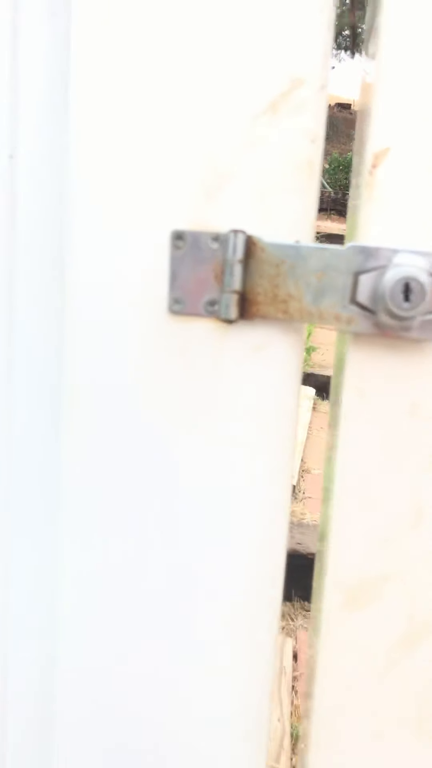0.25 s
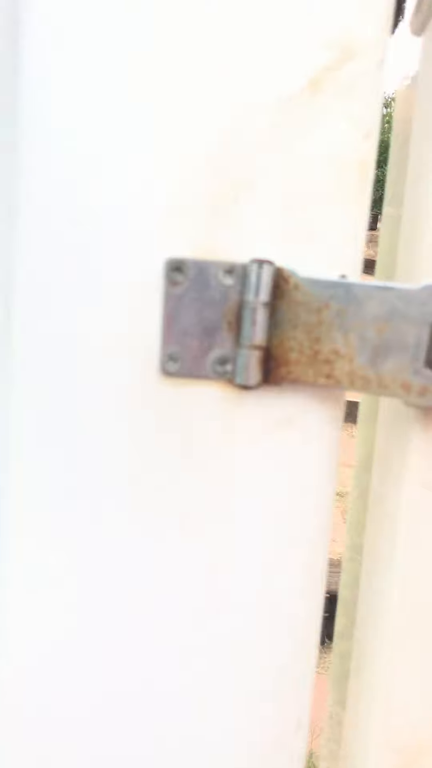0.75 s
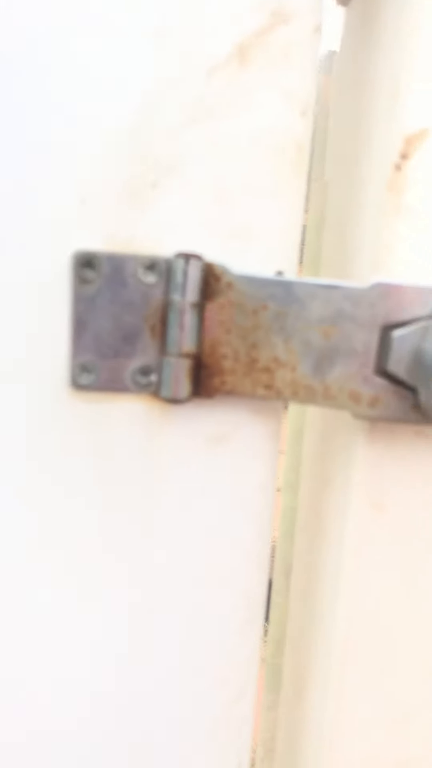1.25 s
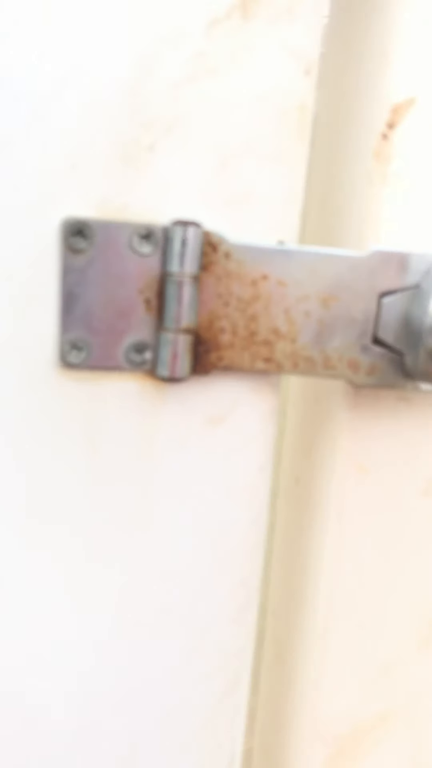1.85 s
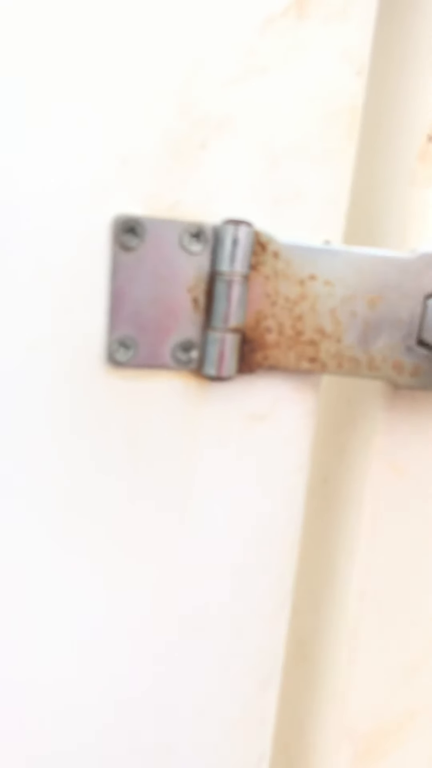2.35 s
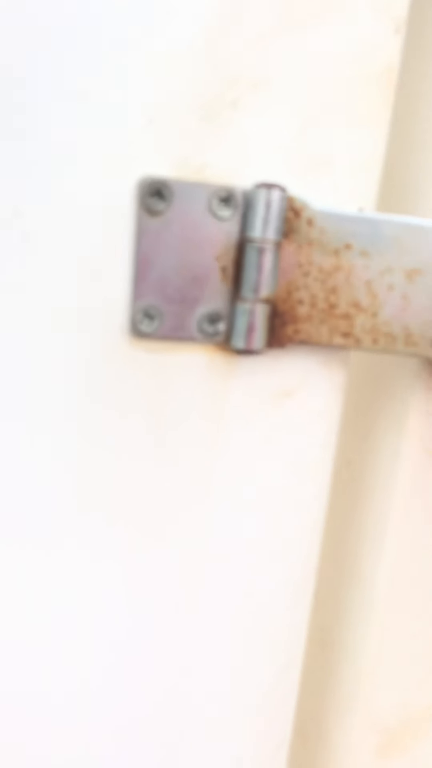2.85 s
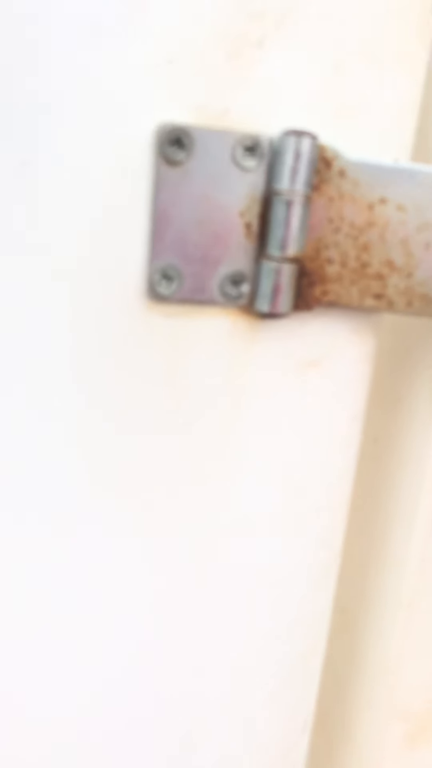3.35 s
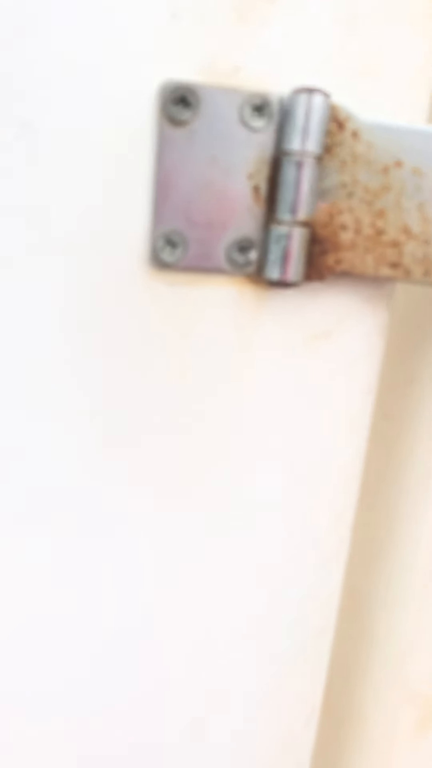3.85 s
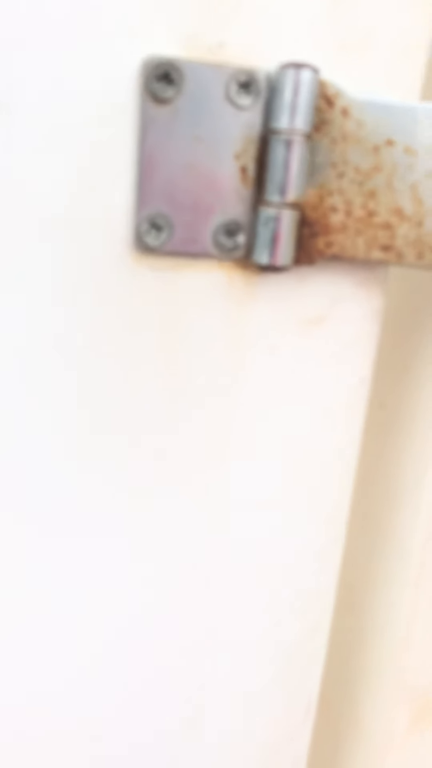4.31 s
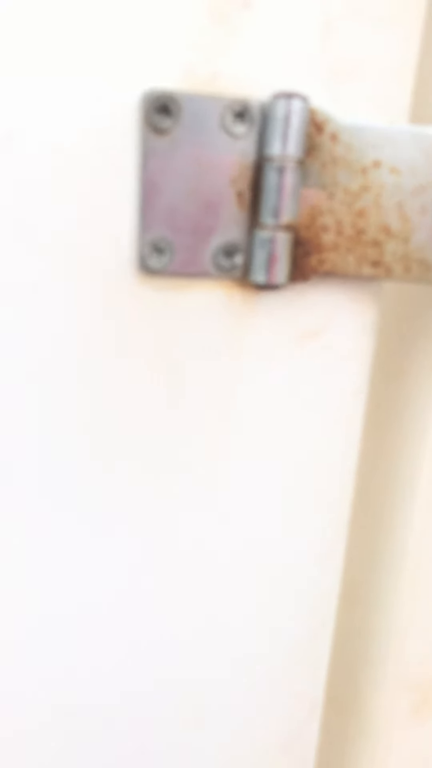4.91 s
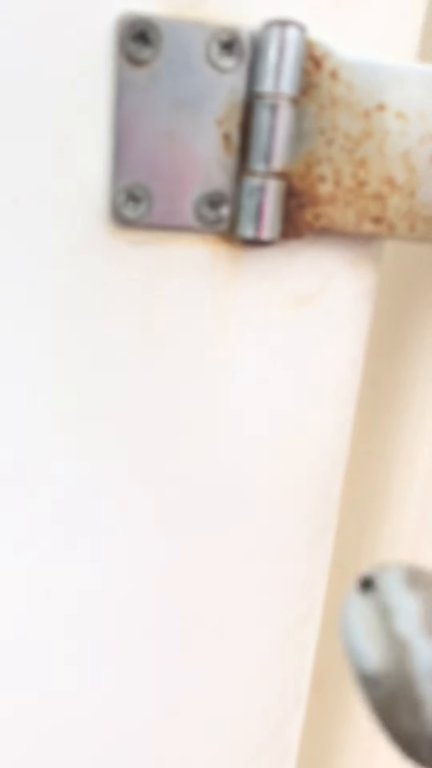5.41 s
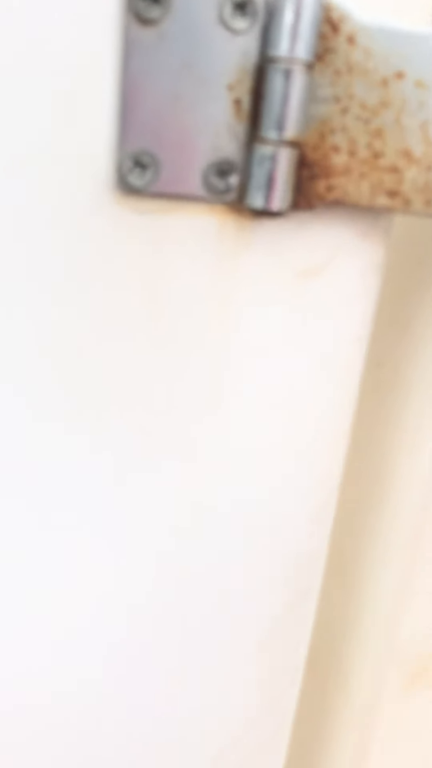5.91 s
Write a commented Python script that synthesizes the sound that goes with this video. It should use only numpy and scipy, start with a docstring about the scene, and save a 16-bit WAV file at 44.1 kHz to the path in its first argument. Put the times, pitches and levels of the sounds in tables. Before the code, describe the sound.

Dry, close outdoor sound over a soft low rumble that builds slightly in the first two seconds. A hand rustles at the start and again around 0.7 s, with small steel ticks from 0.8 to 1.0 s. Pins ping at 1.25 s as the key goes in; hard bright snaps come at 1.5 and 1.67 s, then the hollow gate bumps loudest at 1.9 s, with a low thud again at 2.14 s. A far bird gives thin, buzzy gliding whistles, clearest between 2 and 3.3 s. Keys jingle finely and metal rubs and ticks, quieter from 3 to 4 s. Bright key clinks at 4.1 and 4.4 s lead to clacks at 4.55 and 4.86 s. At 5.25-5.6 s the rusty hasp squeaks very briefly and scrapes in gritty bursts. Rustling and scattered light ticks end it by about 6 s.

```python
"""A hand brushes past and a key is worked into the lock of a steel hasp on a hollow fence gate, outdoors.
Each contact rings keys, hasp, panel and frame by its own levels: noise bursts plus decaying sines. Early on a far
bird calls in gliding noise bands over a filtered-noise rumble; sprung pins ping, the lock snaps, and the gate bumps
on its lowest mode as the lock lets go. Keys jingle as grazed high modes; late clicks follow. Last, the hasp
opens: random slips scrape through steel resonances, a gliding tone squeaks, and filtered slips rustle as the hand brushes."""
import sys
import numpy as np
from scipy import signal
from scipy.fft import rfft, irfft, next_fast_len
from scipy.io import wavfile
from scipy.ndimage import uniform_filter1d

SR = 44100
rng = np.random.default_rng(int(sys.argv[2]) if len(sys.argv) > 2 else 0)


def int16_out(signal):
    """Quantize to a 16-bit WAV file."""
    q = np.round(np.clip(np.atleast_2d(signal).T, -1, 1) * 32767)
    wavfile.write(sys.argv[1], SR, q.astype(np.int16))


N = 272097
TIME = np.arange(N) / SR
RING_TIME = np.arange(SR // 3) / SR

# Modes of the keys. Each row: frequency in Hz, relative level in dB, t60 in seconds.
KEYS = [(6380, -5, 0.067), (7130, -6, 0.048), (7500, -7, 0.082), (8600, -9, 0.028), (9300, -9, 0.032),
        (9860, -3, 0.033), (11500, -5.5, 0.063), (12500, -26, 0.037), (14400, -49.5, .05),
        (14170, -5.5, 0.026)]
# Spectrum of the hiss of rubbed steel. Each row: frequency in Hz, relative density in dB.
HISS_COLOUR = [(1000, 0), (2400, -11), (3200, -1), (4700, 0.5), (7000, -3.5), (10000, -27), (16000, -5)]
# How hard the hand works key and hasp. Each row: time in seconds, relative level of rubbing steel in dB.
EFFORT = [(0.0, -81), (0.93, -74), (1.48, -67), (1.89, -62.5), (2.23, -81), (2.42, -69), (2.58, -66),
          (2.75, -64.5), (3.28, -71.5), (3.73, -76), (3.88, -76), (4.29, -80.5), (4.52, -69.5), (5.29, -62),
          (5.41, -58.5), (5.46, -69), (5.59, -74), (6.17, -72)]


def from_db(db):
    """Decibels to gain."""
    return 10 ** (np.asarray(db) / 20)


def rms_one(x):
    """Scale to unit rms."""
    return x / np.sqrt(np.mean(x ** 2) + 1e-20)


def in_time(rows):
    """Each column of a curve at every sample."""
    s, *columns = np.transpose(rows)
    return [np.interp(TIME, s, c) for c in columns]


def add(track, s, sound):
    """Mix a sound in at time s."""
    at = int(s * SR)
    track[at:at + len(sound)] += sound[:N - at]


def coloured(x, colour):
    """Causal (minimum-phase) filter with the given spectrum."""
    size = next_fast_len(len(x) + 2048, True) // 2 * 2
    hz, db = np.transpose(colour)
    bin_hz = np.arange(size // 2 + 1) * SR / size
    log_gain = np.log(from_db(np.interp(np.log(bin_hz + 1), np.log(hz), db)))
    # folding the cepstrum onto positive time gives minimum phase
    cepstrum = irfft(log_gain)
    cepstrum[1:size // 2] *= 2
    cepstrum[size // 2 + 1:] = 0
    return irfft(rfft(x, size) * np.exp(rfft(cepstrum)))[:len(x)]


def noise(colour):
    """Steady coloured noise, rms 1."""
    return rms_one(coloured(rng.standard_normal(N), colour))


def drift(per_s):
    """Random curve through per_s knots a second, rms 1."""
    knots = rng.standard_normal(int(N / SR * per_s) + 2)
    return rms_one(np.interp(TIME * per_s, np.arange(len(knots)), knots))


def swells(rows, drop_db=23.5):
    """Gain of movements that swell and fade evenly, drop_db weaker one half-length from their middles."""
    return sum(from_db(db - drop_db * np.abs(TIME - s) / half_s) for s, half_s, db in rows)


def dying(t60_s):
    """Exponential decay after a blow."""
    return from_db(-60 * RING_TIME / t60_s)


def mode_shapes(modes):
    """One decaying sine per mode."""
    return np.array([from_db(db) * dying(t60_s) * np.sin(2 * np.pi * hz * RING_TIME)
                     for hz, db, t60_s in modes])


def resonance(x, hz, sharpness):
    """A broad resonance with gain 1 on top."""
    return signal.lfilter(*signal.iirpeak(hz, sharpness, fs=SR), x)


def slips(per_s, spread_db):
    """Random tiny slips of uneven size."""
    return (rng.random(N) < per_s / SR) * rng.standard_normal(N) * from_db(spread_db * drift(220))


def rubbed_steel(per_s, spread_db):
    """Slips ring the resonances of the steel; rms 1."""
    # Resonances of rubbed steel. Each row: frequency in Hz, relative level in dB, t60 in seconds.
    resonances = [(2373, -2, 0.044), (3770, 5.5, 0.0048), (4520, 6, 0.012), (4950, 5, 0.0054),
                  (6850, 1.5, 0.0058), (8960, -17, .02), (9700, -23, 0.0077), (12500, -7, .012),
                  (14500, -15, .008)]
    ring = mode_shapes(resonances).sum(axis=0)
    return rms_one(signal.fftconvolve(slips(per_s, spread_db), ring)[:N])


def swish(length_s, hz, width_hz):
    """A band of noise around a steady or moving centre that swells and fades."""
    count = int(length_s * SR)
    low_pass = signal.butter(3, width_hz / 2, fs=SR, output="sos")
    wobble = signal.sosfilt(low_pass, rng.standard_normal(count) + 1j * rng.standard_normal(count))
    carrier = np.exp(2j * np.pi * np.cumsum(hz * np.ones(count)) / SR)
    return rms_one((wobble * carrier).real) * signal.windows.tukey(count, .5)


def outdoors(rumble_db=-46.5, air_db=-57.5, approach_s=2, approach_db=-4.5):
    """Even air, and a low rumble that builds as the gate is approached: two coloured noises."""
    # Spectra of rumble and air. Each row: frequency in Hz, relative density in dB.
    rumble_colour = [(12, -52), (20, -20.5), (29, -24.5), (36, -33), (44, -2), (59, 2.5), (108, -1),
                     (140, -5), (179, -6.5), (211, -9.5), (330, -17), (430, -25.5), (730, -120)]
    air_colour = [(140, -29), (230, -4.5), (303, -3), (386, -3.5), (422, -5), (520, -6), (835, -3.5),
                  (1500, -10.5), (2270, -20.5), (3200, -32), (4160, -25), (7040, -120)]
    build_db = approach_db * np.clip(1 - TIME / approach_s, 0, 1)
    return from_db(rumble_db + build_db) * noise(rumble_colour) + from_db(air_db) * noise(air_colour)


def far_bird():
    """Thin, buzzy whistles: noise bands glide, then level off, under a fast random flutter."""
    # Each row: start in seconds, length in seconds, start in Hz, end in Hz, width in Hz, relative level in dB.
    calls = [(0.379, 0.2, 8500, 8300, 500, -73), (1.257, 0.24, 7960, 8250, 550, -67),
             (2.078, 0.32, 5770, 7120, 1140, -60), (2.79, 0.14, 8300, 8300, 500, -65),
             (2.347, 0.136, 7900, 8100, 500, -69), (2.957, 0.3, 6450, 7200, 1100, -61)]
    out = np.zeros(N)
    for s, length_s, start_hz, end_hz, width_hz, db in calls:
        glide = np.linspace(1, 0, int(length_s * SR)) ** 2
        hz = end_hz + (start_hz - end_hz) * glide
        add(out, s, from_db(db) * swish(length_s, hz, width_hz))
    return out * from_db(0.74 * drift(180) - 6.0)


def hand_rustle(floor_db=-74, trim_db=3.0):
    """Hand and sleeve rustle in very dense slips that swell as they brush past."""
    # Each row: middle in seconds, half-length in seconds, relative level in dB.
    brushes = [(0.04, 0.16, -56), (0.3, 0.38, -68.5), (0.66, 0.18, -58), (1.9, 0.82, -62.5),
               (5.42, 0.11, -58), (6.0, 0.59, -62)]
    # Spectrum of the rustle. Each row: frequency in Hz, relative density in dB.
    rustle_colour = [(1350, -6.5), (2300, -3), (5030, -5.5), (6140, -6), (7540, -10.5), (8530, -8),
                     (10700, -14), (12800, -9), (15800, -17), (16500, -71.5)]
    movement = np.hypot(from_db(floor_db), swells(brushes))
    return movement * from_db(trim_db) * rms_one(coloured(slips(25000, 2.05), rustle_colour))


def key_rubbing():
    """The key rubs in the lock; rough spots catch and release in a fine crackle."""
    effort_db, = in_time(EFFORT)
    rubbing = from_db(effort_db - 2.5) * rubbed_steel(per_s=2500, spread_db=2.0)
    catches = from_db(effort_db - 4) * rms_one(coloured(slips(450, 1.5), HISS_COLOUR))
    return rubbing + catches


def jingle(per_s=120, centre_hz=12300, width_hz=4000, count=7, stir_db=-77):
    """Loose keys of slightly different sizes graze each other and ring mostly in their highest modes."""
    # Shakes of the bunch. Each row: middle in seconds, half-length in seconds, relative level in dB.
    shakes = [(1.875, 0.15, -53), (2.5, 0.16, -57), (3.15, 0.34, -57), (3.86, 0.26, -58.5),
              (4.555, 0.066, -55)]
    out = np.zeros(N)
    keys = [mode_shapes([(hz * size, db, t60_s) for hz, db, t60_s in KEYS])
            for size in np.linspace(.93, 1.05, count)]
    high = np.exp(-((np.array(KEYS)[:, 0] - centre_hz) / width_hz) ** 2)
    shaking = np.hypot(from_db(stir_db), swells(shakes))  # barely stirs in between
    for s in rng.uniform(0, TIME[-1], int(per_s * TIME[-1])):
        strength = shaking[int(s * SR)] * from_db(rng.normal(0, 3))
        weights = high * rng.standard_normal(len(KEYS))
        add(out, s, strength * weights @ keys[rng.integers(count)])
    return out


def key_in_lock(pin_t60_s=0.0095, pin_rise_s=0.00023):
    """Sprung pins ping briefly over the key's teeth; the key slides with an uneven, grainy hiss."""
    # Each row: time in seconds, frequency in Hz, level in dB before the attack.
    pins = [(1.2337, 4440, -25), (1.2454, 4660, -20.5), (1.2629, 4580, -21.5), (1.4818, 4330, -38),
            (1.49, 4350, -36)]
    # Slides on steel. Each row: start in seconds, length in seconds, centre in Hz, width in Hz, relative level in dB.
    slides = [(1.27, 0.12, 4440, 1700, -70), (1.85, 0.046, 8450, 2480, -61), (2.47, 0.051, 5500, 5300, -52),
              (2.545, 0.037, 5500, 3200, -66), (2.36, 0.018, 6000, 4500, -65),
              (2.625, 0.068, 4850, 3800, -67), (3.868, 0.032, 1700, 2200, -56.5),
              (5.384, 0.079, 9600, 2200, -63), (5.349, 0.296, 3960, 2800, -64),
              (4.75, 0.048, 10000, 4000, -70), (5.458, 0.18, 6660, 1000, -68),
              (6.02, 0.048, 4600, 2510, -61.5)]
    pings, sliding = np.zeros(N), np.zeros(N)
    attack = 1 - np.exp(-RING_TIME / pin_rise_s)
    for s, hz, db in pins:
        add(pings, s, mode_shapes([(hz, db, pin_t60_s)])[0] * attack)
    for s, length_s, hz, width_hz, db in slides:
        add(sliding, s, from_db(db) * swish(length_s, hz, width_hz))
    return pings + sliding * from_db(4.5 * drift(250))


def scrape():
    """Rusty steel grinds in dense slips as the hasp swings open, and the hinge briefly sings."""
    # Each row: time in seconds, relative grinding level in dB, relative hiss level in dB.
    rub = [(5.18, -66, -76), (5.28, -47, -42.5), (5.316, -48, -51), (5.332, -31.5, -50),
           (5.346, -47.5, -58), (5.49, -52.5, -49.5), (5.554, -36.5, -52), (5.564, -44, -44.5),
           (5.72, -81, -92)]
    # Spectrum of the grinding. Each row: frequency in Hz, relative density in dB.
    grind_colour = [(150, -12), (450, 6.5), (1000, 8), (1600, -7), (2500, -7.5), (5000, -34)]
    # Hinge squeak. Each row: time in seconds, mean pitch in Hz, relative level in dB.
    squeak_curve = [(5.228, 1003, -71), (5.238, 958, -38), (5.25, 945, -46), (5.266, 1028, -64),
                    (5.277, 1094, -30), (5.285, 1160, -28.5), (5.291, 1720, -36), (5.303, 1420, -35),
                    (5.313, 1500, -49)]
    grind_db, hiss_db = in_time(rub)
    moving = (TIME > rub[0][0]) & (TIME < rub[-1][0])
    moving = uniform_filter1d(1. * moving, size=900)
    grind = from_db(grind_db + 1.0) * rms_one(coloured(slips(1600, 2.5), grind_colour))
    hiss = from_db(hiss_db - 10) * rms_one(coloured(slips(1500, 3.3), HISS_COLOUR))
    ringing = from_db(hiss_db - 6.0) * rubbed_steel(per_s=610, spread_db=5.5)
    hz, squeak_db = in_time(squeak_curve)
    phase = 2 * np.pi * np.cumsum(hz * (1 + 0.03 * drift(700))) / SR
    tone = np.sin(phase) + from_db(-17) * np.sin(2 * phase)
    squeak = from_db(squeak_db + 3.7 * drift(300)) * tone
    singing = (TIME > squeak_curve[0][0]) & (TIME < squeak_curve[-1][0])
    return moving * (grind + hiss + ringing) + singing * squeak


def sway(hz=63, t60_s=0.15, rise_s=0.033, knock_hz=440, knock_t60_s=.028):
    """The hollow post knocks at once; the gate's lowest mode swells as the blow spreads through it."""
    # Blows that move the whole gate. Each row: time in seconds, relative sway level in dB, knock level in dB.
    blows = [(1.516, -43, -43), (1.668, -49, -48), (1.9067, -22.5, -13), (2.144, -29.5, -35),
             (4.555, -44, -41), (4.867, -33.5, -48)]
    out = np.zeros(N)
    swell = 1 - np.exp(-RING_TIME / rise_s)
    for s, db, knock_db in blows:
        add(out, s, swell * mode_shapes([(hz, db + 9.5, t60_s)])[0])
        add(out, s, mode_shapes([(knock_hz, knock_db, knock_t60_s)])[0])
    return out


def faint_ticks(per_s=7, hasp_hz=(2000, 5400), keys_hz=(6200, 14000), spread_db=4):
    """The key shifts in its slot at random moments, harder with more effort."""
    count = int(per_s * TIME[-1])
    s = (np.arange(count) + rng.random(count)) / count * TIME[-1]
    effort_db = np.interp(s, *np.transpose(EFFORT))
    frame, panel, hasp, keys = effort_db + spread_db * rng.standard_normal((count, 4)).T
    return list(zip(s, frame + 9, panel + 9, hasp + 10.5, rng.uniform(*hasp_hz, count),
                    keys + 3.5, rng.uniform(*keys_hz, count)))


def contacts():
    """Every blow spreads from the part it hits to the others.

    Each row: time in seconds, frame dB, panel dB, hasp dB, hasp Hz, keys dB, keys Hz; levels relative."""
    # Keys clink on ring and lock. Each row: time in seconds, relative level in dB, strongest frequency in Hz.
    key_clinks = [(0.107, -46.5, 6170), (1.234, -44, 14800), (1.361, -51, 13200), (1.509, -32, 12900),
                  (2.7405, -58, 15000), (3.12, -51, 11000), (3.3517, -63, 14000), (3.5558, -50, 11700),
                  (3.7283, -54, 11400), (3.8881, -49, 9200), (4.0923, -35, 6850), (4.1846, -52, 6100),
                  (4.2383, -53.5, 9250), (4.314, -53, 6260), (4.3985, -33.5, 7950), (4.422, -37, 14600),
                  (4.45, -47, 14200), (4.526, -50, 14300), (4.7418, -57, 7100), (4.7973, -33.5, 12300),
                  (4.845, -44, 9700), (4.864, -29.5, 11900), (5.233, -52.5, 11600), (5.423, -50, 7350),
                  (5.6506, -54, 12200), (5.6745, -55, 12400), (5.7844, -44.5, 9300), (5.7973, -43, 13700),
                  (5.9303, -51.5, 8000)]
    # Steel snaps in lock and hasp. Each row: time in seconds, hasp level in dB, hasp's strongest frequency in Hz,
    # gate level in dB, keys level in dB, keys' strongest frequency in Hz; levels relative.
    lock_clicks = [(0.277, -57, 2170, -58, -70, 6320), (0.7624, -50, 4250, -50.5, -55, 8770),
                   (0.7911, -45, 4180, -41.5, -46.5, 12800), (0.9665, -47.5, 3970, -48, -59, 6400),
                   (1.0146, -42.5, 4100, -38, -35.5, 9300), (1.1624, -59, 2100, -64, -64, 6270),
                   (1.245, -53, 4600, -52, -50, 14000), (1.251, -52, 4600, -39, -51, 8800),
                   (1.297, -38, 3650, -33.5, -44, 8300), (1.3083, -48, 4500, -42, -58, 6400),
                   (1.5129, -26.5, 4450, -21, -45, 6050), (1.5331, -36, 3880, -28.5, -44.5, 6200),
                   (1.6646, -38, 4800, -31.5, -50, 8160), (1.6677, -20, 4340, -22.5, -27, 8000),
                   (1.6752, -33, 3730, -37, -39, 8300), (1.68, -26, 3700, -27.5, -35.5, 6370),
                   (2.3789, -63, 4940, -52, -63, 6400), (2.413, -45, 4440, -53.5, -39, 11100),
                   (2.491, -51, 5200, -47.5, -43.5, 7600), (2.587, -46.5, 2680, -37, -50, 7200),
                   (2.797, -49.5, 4060, -52.5, -40, 10600), (2.8883, -38.5, 4360, -38.5, -41, 7040),
                   (2.928, -55.5, 5340, -49, -50, 6200), (3.9605, -57, 2340, -53, -47, 15200),
                   (3.9963, -55, 2230, -52, -58, 14400), (4.003, -50.5, 4140, -47.5, -63, 14960),
                   (4.0244, -55, 4200, -44.5, -63, 14400), (4.029, -38.5, 2140, -39, -54, 11600),
                   (4.3235, -52.5, 3600, -55, -57, 6900), (4.328, -56, 2490, -61, -53, 9300),
                   (4.519, -47, 4640, -59, -56, 6400), (4.534, -48, 4770, -51, -72, 14000),
                   (4.5503, -35, 4120, -33.5, -42, 13200), (4.553, -33, 4040, -38, -37.5, 13100),
                   (4.5568, -46, 2330, -29.5, -50, 6400), (4.5593, -28.5, 2000, -37, -43.5, 6500),
                   (4.857, -37, 4450, -30, -48, 6400), (4.8608, -27.5, 4500, -33, -39, 6360),
                   (4.8656, -22.5, 3940, -32, -43, 6260), (5.0352, -45, 4400, -42, -41.5, 14500),
                   (5.2783, -44, 2020, -40, -48.5, 6830), (5.3212, -48, 4500, -45, -50, 9200),
                   (5.3296, -34.5, 4570, -35.5, -69, 6400), (5.4446, -45, 2000, -36.5, -55, 6400),
                   (5.5647, -52, 4600, -38, -58, 12900), (5.623, -55, 4700, -59, -56, 6144),
                   (6.0148, -45.5, 2000, -41.5, -50, 8900)]
    # Hasp knocks dully on the gate. Each row: time in seconds, relative panel level in dB, relative frame level in dB.
    gate_knocks = [(1.0346, -44.5, -56), (1.3457, -45.5, -57), (1.5538, -34.5, -49), (1.6773, -49, -36),
                   (1.7476, -31, -34), (1.8, -41.5, -68), (1.8413, -44, -41), (1.9057, -20, -20.5),
                   (1.978, -42.5, -66), (2.0735, -32.5, -42.5), (2.1402, -26, -26.5),
                   (2.2133, -46.5, -41.5), (2.4814, -47, -68), (2.5009, -45.5, -66), (2.8583, -54, -45.5),
                   (3.136, -35.5, -54), (3.1624, -38.5, -54), (3.2687, -51.5, -68), (3.5064, -52, -49.5),
                   (3.8598, -44.5, -47), (4.41, -55, -39.5), (4.5017, -42.5, -45), (4.5804, -45, -59),
                   (4.6669, -40.5, -37), (4.786, -46, -44.5), (4.8189, -46.5, -33.5), (4.8335, -43, -44.5),
                   (4.8837, -45, -35.5), (5.5239, -39, -44), (5.5426, -44, -46), (5.7646, -50.5, -47.5),
                   (5.844, -45, -50.5), (5.8616, -42.5, -46)]
    # level change, and pitch favoured, in parts that a blow reaches second-hand
    clink_to_gate_db, clink_to_hasp_db, clink_hasp_hz = -20, -19, 4770
    panel_to_frame_db = -8
    knock_to_hasp_db, knock_hasp_hz, knock_to_keys_db, knock_keys_hz = -12.5, 1850, -31.5, 9100
    clinks = [(s, db + clink_to_gate_db, db + clink_to_gate_db, db + clink_to_hasp_db, clink_hasp_hz, db, hz)
              for s, db, hz in key_clinks]
    clicks = [(s, gate_db + panel_to_frame_db, gate_db, db, hz, keys_db, keys_hz)
              for s, db, hz, gate_db, keys_db, keys_hz in lock_clicks]
    knocks = [(s, frame_db, db, db + knock_to_hasp_db, knock_hasp_hz, db + knock_to_keys_db, knock_keys_hz)
              for s, db, frame_db in gate_knocks]
    return clinks + clicks + knocks + faint_ticks()


def struck(times_s, levels_db, modes, colour, rise_s, crack_t60_s, tail_t60_s, tail_db, modes_db, size,
           pitches_hz=None, sharpness=1, off_pitch_db=0, click_db=-20):
    """One part under all contacts: click, crack, diffuse tail and modes, levelled over the first `size` samples."""
    out, shapes = np.zeros(N), mode_shapes(modes)
    decay = dying(crack_t60_s) + from_db(tail_db) * dying(tail_t60_s)
    envelope = decay * (1 - np.exp(-RING_TIME / rise_s))
    for k, db in enumerate(levels_db):
        force = rng.standard_normal(len(envelope)) * envelope
        # the surfaces graze, then meet in one hard click
        force[np.argmax(envelope)] -= from_db(click_db) * np.linalg.norm(force[:size])
        crack = coloured(force, colour)
        # each point of contact weights the modes differently
        weights = rng.choice([-1, 1], len(modes)) * from_db(rng.normal(0, 8.1, len(modes)))
        ring = weights @ shapes
        blow = crack / crack[:size].std() + from_db(modes_db) * ring / ring[:size].std()
        if pitches_hz is not None:
            # the small piece that touches favours its own pitch; a low-pitched touch is also dull
            low_pass = signal.butter(4, min(1.65 * pitches_hz[k], SR / 2.2), fs=SR)
            dulled = signal.lfilter(*low_pass, blow)
            blow = resonance(blow, pitches_hz[k], sharpness) + from_db(off_pitch_db) * dulled
        add(out, times_s[k], from_db(db) * blow / blow[:size].std())
    return out


def lock_and_gate():
    """Small steel parts snap and die at once; the hollow gate rattles on."""
    # Modes of each part. Each row: frequency in Hz, relative level in dB, t60 in seconds.
    frame_modes = [(118.8, -5, 0.53), (185.7, 1, 0.24), (311, 6, 0.067), (355, -10, 0.26),
                   (450, -23, 0.032), (494, -8, 0.11)]
    panel_modes = [(695, -3, 0.09), (774, -0.5, 0.029), (874, -10, 0.05), (1090, 5, 0.027),
                   (1344, 6, 0.021), (1524, 0.5, 0.047)]
    hasp_modes = [(1990, -6, .04), (2355, -2.5, .05), (3010, -8, .035), (3610, 1, .035), (3840, -3, .025),
                  (4235, 1, .035), (4600, 1, .03), (4815, -2, .025), (5040, -2, .03), (5490, -11, .035)]
    # Spectra of the dense, unresolved part of each ring. Each row: frequency in Hz, relative density in dB.
    frame_colour = [(60, -24), (130, 2.5), (230, -4), (340, -0.5), (500, -3.5), (700, -13), (1500, -52)]
    panel_colour = [(250, -28.5), (520, -14), (700, -5.5), (1400, -10), (1750, -17.5), (3500, -46)]
    hasp_colour = [(900, -6), (1700, -22), (2100, 4), (3000, -1), (3700, 1.5), (5000, -1.5), (6000, -9),
                   (10000, -82)]
    keys_colour = [(3000, -17), (5500, 1), (8400, 1.5), (10500, -0.5), (12500, 4), (16000, -1.5)]
    s, frame_db, panel_db, hasp_db, hasp_hz, keys_db, keys_hz = np.transpose(contacts())
    frame = struck(s, frame_db, frame_modes, frame_colour, rise_s=0.0029, crack_t60_s=0.035,
                   tail_t60_s=0.28, tail_db=-6.0, modes_db=-6.0, size=970)
    panel = struck(s, panel_db, panel_modes, panel_colour, rise_s=0.0013, crack_t60_s=0.028,
                   tail_t60_s=0.12, tail_db=-5.0, modes_db=-1.5, size=440, click_db=-20.5)
    hasp = struck(s, hasp_db, hasp_modes, hasp_colour, rise_s=0.00086, crack_t60_s=0.0059,
                  tail_t60_s=0.077, tail_db=-21, modes_db=1.0, size=220,
                  pitches_hz=hasp_hz, sharpness=12, off_pitch_db=-1, click_db=4)
    keys = struck(s, keys_db, KEYS, keys_colour, rise_s=0.00073, crack_t60_s=0.0059,
                  tail_t60_s=0.053, tail_db=-22, modes_db=-18, size=176,
                  pitches_hz=keys_hz, sharpness=12, off_pitch_db=-5.0, click_db=-4.0)
    return from_db(-4.5) * frame + from_db(-2.98) * panel + from_db(1.07) * hasp + from_db(0.07) * keys


def scene():
    """All sources summed in one channel, in open air: no reverberation."""
    background = outdoors() + far_bird() + hand_rustle()
    handling = key_rubbing() + jingle() + key_in_lock()
    return (background + handling + scrape() + sway() + lock_and_gate())[None]


def record(dry):
    """The top of the range is cut steeply above 16.1 kHz."""
    return signal.sosfilt(signal.ellip(10, .2, 70, 16100, fs=SR, output="sos"), dry)


dry = scene()
out = record(dry)
int16_out(out)
```